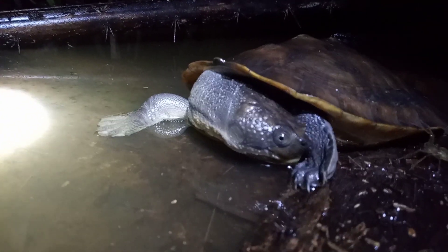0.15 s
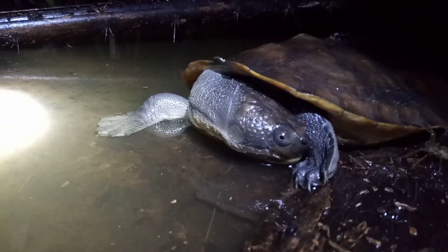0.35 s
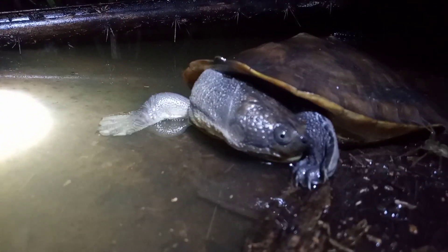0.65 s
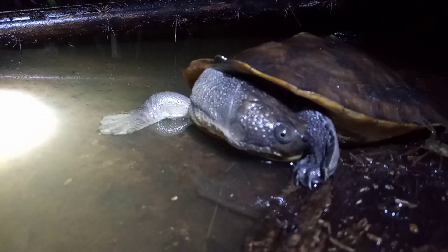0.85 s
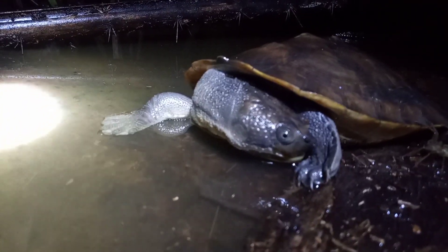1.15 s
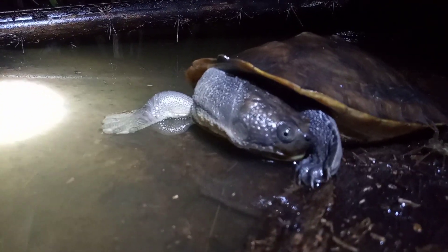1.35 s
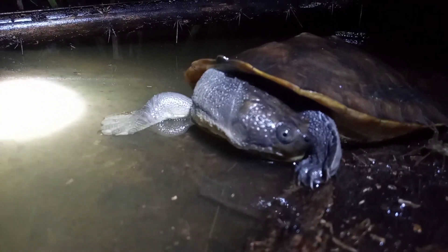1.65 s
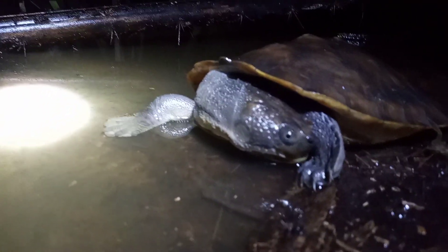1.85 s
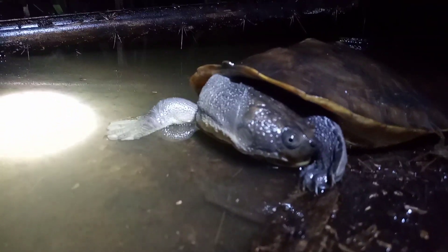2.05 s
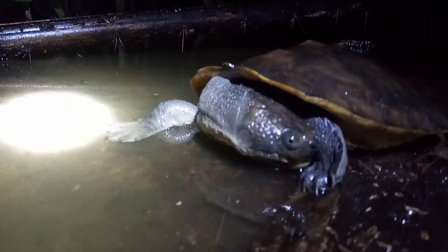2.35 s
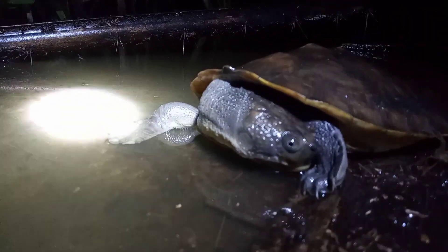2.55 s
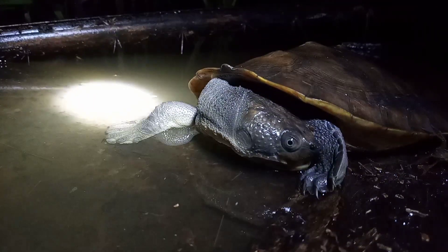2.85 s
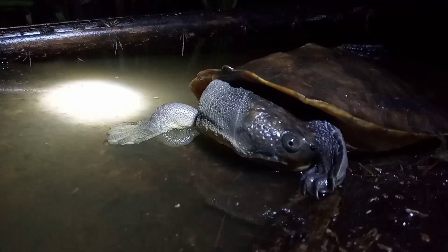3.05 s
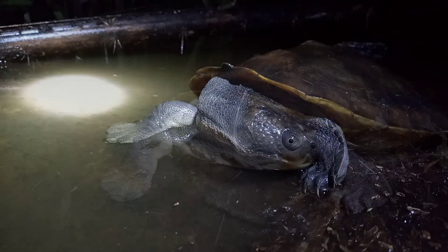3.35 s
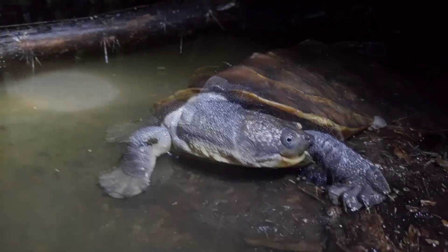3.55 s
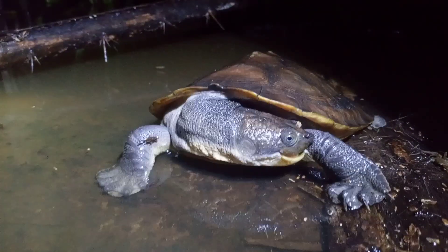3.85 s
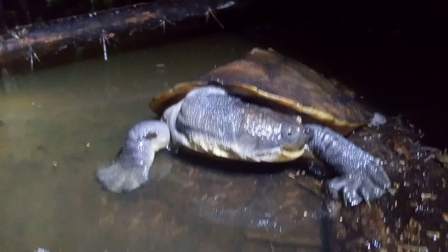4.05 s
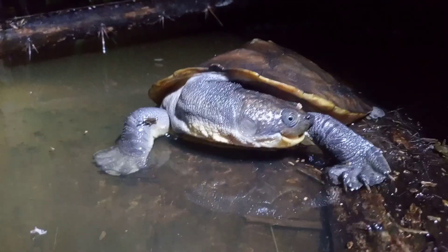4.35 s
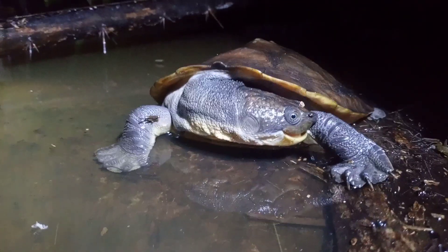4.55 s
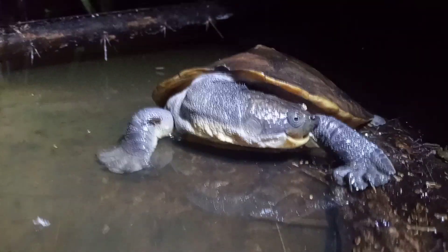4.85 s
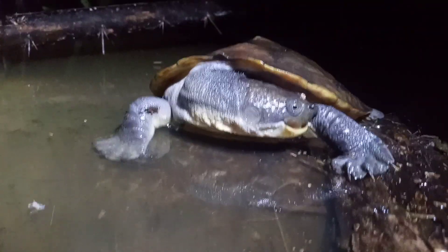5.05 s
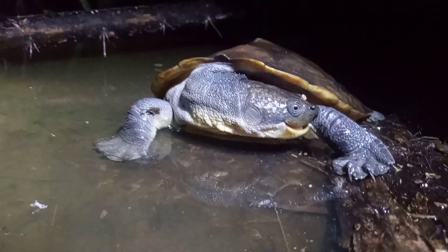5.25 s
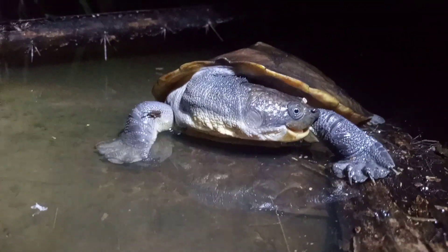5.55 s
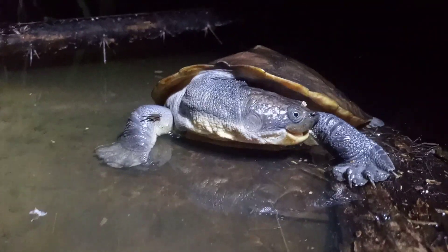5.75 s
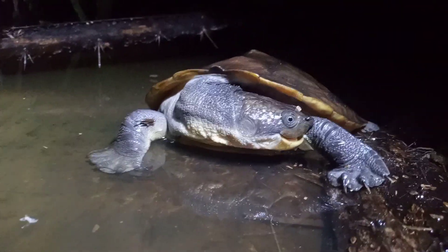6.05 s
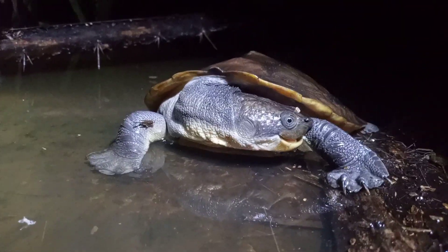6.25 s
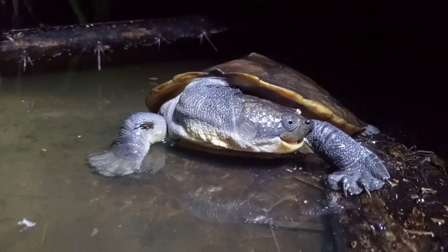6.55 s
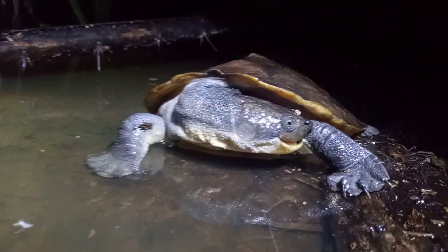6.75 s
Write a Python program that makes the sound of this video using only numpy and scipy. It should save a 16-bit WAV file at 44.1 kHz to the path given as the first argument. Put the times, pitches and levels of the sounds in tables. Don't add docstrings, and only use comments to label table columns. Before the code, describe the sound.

A swamp at night: high insect drone and pulsing katydid buzz, frogs whooping and quacking, water gurgling and dripping, then a sharp twig crack.

```python
import sys
import numpy as np
from scipy import signal
from scipy.fft import rfft, irfft, next_fast_len
from scipy.io import wavfile
from scipy.ndimage import uniform_filter1d, map_coordinates

SR = 44100
rng = np.random.default_rng(int(sys.argv[2]) if len(sys.argv) > 2 else 0)


def to_wav(sig):
    pcm = np.clip(np.atleast_2d(sig), -1, 1) * 32767
    pcm = np.round(pcm).astype(np.int16)
    wavfile.write(sys.argv[1], SR, pcm.T)


def linear_from_db(decibels):
    return 10 ** (np.asarray(decibels, float) / 20)


N = 304290
RIGHT_LEAD = 56

# (time [s], level [dB])
DRONE_LEVEL = [(0, -45), (2.88, -44), (3.55, -49.5), (4.28, -46), (5.5, -48), (5.9, -45.5), (6.9, -48)]
# (frequency [Hz], level [dB per Hz])
DRONE_COLOUR = [(3180, -63), (5400, -51), (5610, -53.5), (5990, -19), (6120, -64), (6210, -8), (6770, -2),
                (7100, 4.5), (7510, 4), (8000, 0), (8190, -4.5), (9510, -4.5), (9970, -15), (10300, -22.5),
                (11000, -87), (14300, -59), (22000, -120)]
# (wing strokes [per s], frequency [Hz], width [Hz], level [dB])
NEAR_SINGERS = [
    (177.7, 7250, 210, -57.5),
    (214.4, 7720, 84, -60.5),
    (223.5, 9250, 210, -71),
    (188.3, 6650, 150, -75),
]
# (time [s], level [dB])
LOW_BAND_LEVEL = [(0, -82), (3.3, -66), (3.7, -62.5), (6.9, -53.5)]
# (time [s], level [dB])
CRICKET_LEVEL = [(0, -88), (1.2, -67.5), (2.7, -57.5), (3.3, -59.5), (4.4, -54.5), (6.9, -55)]
# (start [s], end [s], first level [dB], last level [dB])
KATYDID_SPELLS = [
    (0, 0.122, -75, -72),
    (0.497, 0.746, -77, -56),
    (1.29, 1.405, -52, -60),
    (1.46, 1.67, -55, -49),
    (2.343, 2.698, -60, -48),
    (2.73, 3.437, -46.5, -52),
    (3.457, 3.89, -54, -68),
    (4.302, 5.67, -81, -68.5),
    (5.706, 6.224, -46.5, -45.5),
    (6.43, 6.9, -45, -45),
]
# (frequency [Hz], level [dB per Hz])
WING_COLOUR = [(7650, -74), (13000, -89), (13700, -11), (14100, 1), (14600, 14.5), (15000, 15),
               (15400, 17.5), (15800, 12.5), (16300, -27)]
# (time [s], level [dB])
CHORUS_LEVEL = [(0, -52.5), (.36, -52.5), (1.1, -50), (2.4, -57), (2.69, -54), (3.23, -55.5), (3.5, -97),
                (3.65, -50.5), (4.5, -55.5), (4.75, -51.5), (5.73, -60), (6.11, -52.5), (6.9, -61)]
# (time [s], level [dB])
GRIP_LEVEL = [(0, -70), (2.7, -71.5), (3.6, -80.5), (4.3, -74), (6.9, -76)]
# (frequency [Hz], level [dB per Hz])
RUMBLE_COLOUR = [(15, -37), (25, -47), (45, -15.5), (62, -6.5), (107, 0.5), (151, -3.5), (220, -12),
                 (300, -46), (390, -14), (660, -120)]
# (time [s], peak level [dB], camera shell level [dB])
BUMPS = [(0.581, -55, -37), (1.068, -54, -35), (1.128, -53, -27), (2.239, -58, -30), (4.157, -53, -5.5),
         (4.299, -57.5, 1), (4.748, -56.5, -11.5), (4.936, -43, -13), (5.095, -58, -6.5), (5.522, -50, -24),
         (5.928, -65, -5.5), (6.292, -58.5, -21)]
# (frequency [Hz], level [dB per Hz])
AIR_COLOUR = [(88, -54), (150, -30.5), (257, -15), (456, -19), (1240, -20.5), (1690, -21.5), (1940, -25.5),
              (2170, -2.5), (2270, -2), (2690, -4.5), (3000, -16.5), (4270, -19), (4760, -10), (5470, -25),
              (6000, -14), (7800, -66), (13200, -120)]
# (time the climb locks [s], tone level [dB], rasp level [dB], strongest partial [Hz], tone fade [dB/s])
WHOOPS = [(0.002, -51.5, -58, 2660, 166), (0.235, -45.5, -53.5, 2632, 80), (1.238, -49, -58, 2687, 102),
          (1.623, -49, -64, 2689, 117), (3.537, -43, -50, 2490, 230), (3.79, -44.5, -44.5, 2540, 269),
          (4.101, -37.5, -49.5, 2461, 313), (4.829, -47.5, -68, 2730, 133), (5.097, -44, -50.5, 2652, 93),
          (5.463, -43, -48.5, 2643, 75), (6.831, -50.5, -61, 2690, 137)]
# (lead [s], swell [dB], fade [dB/s], fade of the low note [dB/s])
RASPS = [(.066, 6, 900, 900), (0.084, 11, 302, 159), (0.076, 16, 270, 260), (0.058, 10, 278, 260),
         (0.069, 6.5, 498, 450), (0.072, 13, 600, 448), (0.064, -1, 900, 602), (0.072, 14, 338, 330),
         (0.075, 12.5, 352, 185), (0.076, 15.5, 350, 165), (0.05, 6.5, 370, 350)]
# (time [s], gain [dB], width [s])
THROBS = [(.06, 10.5, 0.0058), (.12, 6, 0.02), (0.278, 7, 0.011), (.34, 3, 0.014), (.42, 4, 0.038),
          (1.235, 2, .01), (1.29, 8.5, 0.029), (1.335, 12, .015), (1.62, 4.5, .02), (1.665, 11, 0.0056),
          (1.702, 14, 0.0079), (1.74, 7, 0.0084), (3.53, -5, 0.013), (3.55, 4.5, 0.013), (3.625, 13, .01),
          (3.812, 9, 0.012), (3.833, 18, 0.0034), (3.884, 22.5, 0.018), (4.108, -0.5, 0.014),
          (4.174, 16.5, 0.0082), (5.095, 6.5, 0.0081), (5.136, 8, 0.01), (5.225, 11.5, 0.015),
          (5.48, 9, 0.0093), (5.513, 12.5, 0.0066), (5.562, 6.5, 0.0039), (5.59, 7.5, 0.0058),
          (5.64, 9, 0.0099)]
# (multiple of the low note [count], level against the second partial [dB])
OVERTONES = [(3, -16), (4, -21), (5, -8)]
# (frequency [Hz], width [Hz], level [dB])
LIMP_SAC = [(1010, 110, -2.5), (1390, 270, -1), (2000, 170, 4.5)]
# (frequency [Hz], width [Hz], level [dB])
SLACK_SAC = [(1118, 78, 0), (1380, 160, -0.5), (2090, 57, -9)]
# (frequency [Hz], width [Hz], level [dB])
TAUT_SAC = [(1124, 81, -9.5), (1880, 750, -11.5), (2503, 200, 3), (3520, 81, -11), (4690, 72, -1.5)]
# (time [s], level [dB], fade [dB/s])
GURGLES = [
    (0.002, -61, 243),
    (1.171, -59, 175),
    (2.51, -49, 112),
    (2.646, -59.5, 273),
    (2.99, -63.5, 86),
    (6.516, -71, 51),
    (6.686, -69, 403),
    (6.834, -65, 172),
]
# (time [s], peak level [dB], body level [dB], left over right [dB], ring [Hz])
TICKS = [(0.135, -52.5, -39.5, 11, 14700), (0.5574, -75, -65, 12, 14600), (0.612, -37, -48, 9, 14600),
         (1.0416, -49, -52, 15, 10200), (1.176, -30, -67, 25, 14900), (1.6591, -72, -76, 10, 14700),
         (2.436, -56, -41.5, 0, 14900), (2.621, -29.5, -41, 7, 14600), (2.644, -45, -28, 15, 14910),
         (2.68, -53, -30.5, 12, 15000), (2.885, -56, -70, 8, 11500), (2.912, -50, -69, 16, 11800),
         (2.99, -90, -52, 22, 14730), (3.072, -49, -64, 3, 10000), (3.603, -51, -47, 16, 14720),
         (4.19, -39, -72, 12, 9950), (5.1898, -61.5, -85, -29, 10980), (6.768, -42.5, -57.5, -28, 14700),
         (6.795, -50, -50, -20, 15100), (6.846, -62, -75, -37, 14900)]
# (time [s], level [dB], fade [dB/s])
FAR_CALLS = [(.19, -61, 47), (.45, -69, 200), (.56, -62.5, 13.5), (1.29, -51.5, 108), (1.618, -63, 33),
             (1.83, -65, 75), (2.1, -71, 22), (2.512, -52.5, 87), (2.68, -66, 63), (2.705, -52, 96),
             (3.031, -73, 33), (5.859, -71, 50), (6.1, -77.5, 33), (6.54, -63, 57)]
# (time [s], level [dB], frequency [Hz], time to fall 60 dB [s])
DRIPS = [(.241, -47, 3400, .015), (.557, -47, 1600, .012), (.558, -41, 3000, .015), (.559, -49, 3800, .012),
         (.981, -41, 3900, .018), (1.665, -44, 5680, .014), (2.438, -42, 7000, .012),
         (2.645, -43, 4300, .015), (2.646, -46, 2400, .012), (2.678, -41, 3700, .012),
         (2.912, -50, 2500, .01), (2.99, -48, 3300, .012), (4.285, -50, 5800, .01)]
# (time [s], level [dB], frequency [Hz], time to fall 60 dB [s])
HOOTS = [(.325, -49.5, 417, 0.14), (.472, -64, 620, 0.047), (.64, -63.5, 483, 0.18), (.7, -60, 529, 0.17),
         (1.157, -36, 464, 0.019), (1.158, -44.5, 680, 0.024), (1.881, -66, 516, 0.4),
         (4.539, -60, 319, 0.15), (5.49, -61, 600, 0.25), (5.75, -64.5, 635, 0.13),
         (6.68, -55.5, 810, 0.039), (6.52, -65.5, 659, 0.27), (2.502, -43, 620, 0.036),
         (2.504, -40, 744, 0.028), (2.518, -34, 710, 0.025), (2.529, -45, 825, .03),
         (2.541, -52, 800, .025), (2.555, -45, 600, .035), (2.645, -42, 793, 0.032)]
# (time [s], body level [dB], hiss level [dB], fade [dB/s], voice over body [dB])
QUACKS = [(.56, -60, -74, 88.5, -17), (.68, -66, -97, 118, 1), (0.879, -58.5, -77, 146, -5),
          (1.273, -49, -53.5, 120, -3), (1.791, -72.5, -80, 37, 9.5), (2.68, -52.5, -53, 115, 5),
          (2.993, -58.5, -96, 208, -27), (4.798, -64, -99, 123, -14.5), (5.677, -40, -45, 139, -20),
          (5.834, -43.5, -52, 112, -5), (6.071, -63, -74, 33, -1), (6.522, -52.5, -54, 129, 4.5)]
QUACK_RISES = [1200, 1200, 1200, 1200, 1200, 1500, 1200, 1200, 920, 500, 1200, 1200]
MOUTH_OPENING = [0.093, 0.088, .1, 0.43, .1, 0.34, .1, .1, 0.68, .9, 0.12, 0.27]
# (frequency [Hz], width [Hz], level [dB])
QUACK_THROAT = [(1564, 187, 5.5), (2190, 360, 1.5), (2550, 470, 5), (3450, 870, -0.5), (5300, 1060, -2.5)]
# (frequency [Hz], width [Hz], level [dB])
WIDE_THROAT = [(1730, 250, -1.5), (2168, 280, -4.5), (2790, 280, 2.5), (3430, 300, -0.5),
               (4420, 1100, -10.5)]
# (frequency [Hz], level [dB per Hz])
HISS_COLOUR = [(4500, -22), (8500, 0.5), (10000, 5.5), (12500, 2), (14500, -13), (16000, -1.5)]
# (time [s], level [dB], frequency [Hz], time to fall 60 dB [s])
GULPS = [
    (5.665, -37, 1434, 0.044),
    (5.685, -36, 1800, .04),
    (5.808, -44, 1414, .04),
]
# (time [s], level [dB], extra bass [dB])
CRACKS = [
    (5.3057, -24, 0),
    (5.30615, -18.3, -3),
    (5.3077, -29, 0),
    (5.311, -36, 0),
    (5.3368, -35, -20),
]
# (frequency [Hz], level [dB], time to fall 60 dB [s])
TWIG_RINGS = [(620, -18.5, 0.024), (1120, -3.5, 0.034), (2470, -10.5, 0.017), (2970, 14.5, 0.0037),
              (6550, 20, 0.0027), (7100, -15, 0.0035), (8700, 0, 0.0048), (10200, 4.5, 0.0017),
              (15200, -6, 0.0041)]
# (frequency [Hz], time to fall 60 dB [s])
TREES = [(500, 0.07), (2500, 0.31), (10000, 0.066)]
# (frequency [Hz], loss [dB])
SHADOW = [(60, 7.5), (92, 12.5), (140, 4), (210, 7), (330, 5.5), (500, 5.5), (770, 8), (1170, 5.5),
          (1790, 13.5), (2740, 24.5), (4190, 82), (6410, 35.5), (9810, 4), (15000, 11.5)]


def unit(x):
    return x / np.sqrt(np.mean(x ** 2) + 1e-20)


def along(points, hz):
    f, v = np.transpose(points)
    return np.interp(np.log(hz + 1), np.log(f + 1), v)


def level_curve(rows):
    s, db = np.transpose(rows)
    return np.interp(np.arange(N) / SR, s, db, left=-120, right=-120)


def swells(s, db, rise, fade, hold_s=0., end_db=None):
    t = np.arange(0, N + 32, 32)[:, None] / SR
    drift = 0 if end_db is None else (end_db - db) * np.clip((t - s) / hold_s, 0, 1)
    level = db + drift - rise * np.maximum(s - t, 0) - fade * np.maximum(t - s - hold_s, 0)
    return np.interp(np.arange(N) / SR, t[:, 0], linear_from_db(level).sum(1))


def wobble(rate):
    return map_coordinates(rng.standard_normal(int(N * rate / SR) + 4), [np.arange(N) * rate / SR])


def filtered(x, response):
    m = next_fast_len(N + 8192)
    return irfft(rfft(x, m) * response(np.fft.rfftfreq(m, 1 / SR)), m)[..., :N]


def resonances(modes):
    def response(f):
        total = 0
        for k, (centre, width, db) in enumerate(modes):
            peak = 1j * f * width / (centre * centre - f * f + 1j * f * width)
            total = total + (-1) ** k * linear_from_db(db) * peak
        return total
    return response


def colour(spectrum):
    return lambda hz: linear_from_db(along(spectrum, hz))


def rush(response, patchy_db, grain_db=0., grain_rate=200., alike=0.):
    z = signal.stft(rng.standard_normal((2, N + 512)), nperseg=512)[2]
    field = uniform_filter1d(rng.standard_normal(z.shape[1:]), size=4, axis=0)
    field = uniform_filter1d(field, size=8, axis=1)
    left, other = signal.istft(z * linear_from_db(patchy_db * unit(field)), nperseg=512)[1][:, :N]
    right = alike * np.roll(left, -RIGHT_LEAD) + np.sqrt(1 - alike ** 2) * other
    return unit(filtered(np.array([left, right]) * linear_from_db(grain_db * wobble(grain_rate)), response))


def pulses(rate, jitter, scatter_db, speed=1.):
    turns = np.cumsum(rate * speed * (1 + jitter * wobble(rate / 2))) / SR
    return (np.diff(np.floor(turns), prepend=0) > 0) * linear_from_db(scatter_db * rng.standard_normal(N))


def ring(hz, db, t60, attack):
    t = np.arange(max(round(t60 * SR), 1024)) / SR
    return linear_from_db(db - 60 * t / t60) * np.sin(2 * np.pi * hz * t) * (1 - np.exp(-t / attack))


def add(track, s, sound):
    part = track[..., round(s * SR):][..., :sound.shape[-1]]
    part += sound[..., :part.shape[-1]]


def rings(events, attack):
    track = np.zeros(N)
    for s, db, hz, t60 in events:
        add(track, s, ring(hz, db, t60, attack))
    return track


def among_trees(x, wet_db):
    hz, t, z = signal.stft(rng.standard_normal((2, SR // 2)), SR, nperseg=256)
    tail = signal.istft(z * linear_from_db(-60 * t / along(TREES, hz)[:, None]), SR, nperseg=256)[1]
    wet = signal.fftconvolve(x[None], tail / np.linalg.norm(tail[0]), axes=1)[:, :N]
    return np.array([x, np.roll(x, -RIGHT_LEAD)]) + linear_from_db(wet_db) * wet


def insect_drone():
    crowd = rush(colour(DRONE_COLOUR), patchy_db=2.0, grain_db=0.5, grain_rate=170)
    drone = linear_from_db(level_curve(DRONE_LEVEL) - 2.2) * crowd
    for rate, hz, width, db in NEAR_SINGERS:
        wing = resonances([(hz, width, 0)])
        song = unit(filtered(pulses(rate, jitter=.06, scatter_db=3), lambda f: wing(f) ** 2))
        drone += among_trees(song * linear_from_db(db + 2.8 * wobble(6.6)), wet_db=1.0)
    low = resonances([(6385, 680, 0)])
    return drone + linear_from_db(level_curve(LOW_BAND_LEVEL)) * rush(lambda f: low(f) ** 2, patchy_db=1.0)


def crickets():
    band = resonances([(4797, 480, 0)])
    return linear_from_db(level_curve(CRICKET_LEVEL) - 12) * rush(lambda f: band(f) ** 2, patchy_db=1.5)


def katydid():
    stroke_hz, turn_hz, lag = 31, 14900, 1.5
    stroke = 2 * np.pi * np.cumsum(stroke_hz * (1 + .03 * wobble(1.7))) / SR

    def throb(turn):
        return linear_from_db(3.1 * np.sin(turn) + 1.4 * np.sin(3 * turn))

    wing = rush(colour(WING_COLOUR), patchy_db=1.2, grain_db=2, grain_rate=700, alike=.55)
    high = filtered(wing, lambda f: np.clip((f - turn_hz) / 500 + .5, 0, 1))
    buzz = unit(throb(stroke) * high + throb(stroke - lag) * (wing - high))
    start, end, first_db, last_db = np.transpose(KATYDID_SPELLS)
    spells = swells(start, first_db, rise=360, fade=250, hold_s=end - start, end_db=last_db)
    far_katydids = linear_from_db(-78)
    return (spells + far_katydids) * linear_from_db(-1.0) * buzz


def far_chorus():
    band = resonances([(2267, 214, 0)])
    blur = rush(lambda f: band(f) ** 2, patchy_db=4.0, grain_db=2.0, grain_rate=25)
    return linear_from_db(level_curve(CHORUS_LEVEL) - 5.0) * blur


def handling():
    rumble = rush(colour(RUMBLE_COLOUR), patchy_db=1, grain_db=4.0, grain_rate=18, alike=0.59)
    out = linear_from_db(level_curve(GRIP_LEVEL) + 1.0) * rumble
    for s, db, shell_db in BUMPS:
        bump = ring(98.3, db + 9.5, 0.092, attack=0.012)
        add(bump, 0, ring(149, db + 3.5, 0.061, attack=0.0075))
        add(bump, 0, ring(341, db + shell_db + 9.5, 0.047, attack=0.0038))
        add(out, s, bump * linear_from_db([[0], [-8]]))
    return out


def night_air():
    return linear_from_db(-61.0) * rush(colour(AIR_COLOUR), patchy_db=5.5)


def whoop_climb():
    climb_s, ends_before_lock_s = .035, .028
    s, t = np.transpose(WHOOPS)[0], np.arange(N) / SR
    call = np.searchsorted(s[1:] - .11, t)
    to_lock = s[call] - t
    return call, to_lock, np.clip((to_lock - ends_before_lock_s) / climb_s, 0, 1)


def whoop_rasps():
    s, _, rasp_db, _, _ = np.transpose(WHOOPS)
    lead, swell_db, fade, _ = np.transpose(RASPS)
    call, to_lock, slack = whoop_climb()
    gain = swells(s - lead, rasp_db - swell_db, 1570, fade, lead - 0.0082, rasp_db)
    slow = np.clip(to_lock / .08, 0, 1)
    train = pulses(205, jitter=.06, scatter_db=2.5, speed=1 - .18 * slow)
    mouth = resonances([(1800, 2600, 0)])

    def through(sac):
        return unit(filtered(train, lambda f: resonances(sac)(f) * mouth(f) ** 2))

    fill_s = .025
    empty = np.clip((to_lock - lead[call] + fill_s) / fill_s, 0, 1)
    low = linear_from_db(1.5) * empty * through(LIMP_SAC) + (1 - empty) * through(SLACK_SAC)
    rasp = slack * low + linear_from_db(-1.5) * (1 - slack) * through(TAUT_SAC)
    return among_trees(linear_from_db(6.5) * gain * rasp, wet_db=-3)


def whoop_tones():
    s, tone_db, rasp_db, hz, fade = np.transpose(WHOOPS)
    call, _, slack = whoop_climb()
    tone_rise, hold_db = 400, 6.5
    gain = swells(s - 0.45 * hold_db / fade, tone_db, tone_rise, fade, hold_db / fade)
    t = np.arange(N) / SR
    gain = gain * linear_from_db(sum(db * np.exp(-((t - at) / width) ** 2) for at, db, width in THROBS))
    top_hz = hz[call]
    rough = np.where(top_hz < 2600, 1, .7)
    climb_share = .13
    turn = np.pi * np.cumsum(top_hz * (1 - climb_share * slack + .005 * rough * wobble(160))) / SR
    effort = gain / linear_from_db(-36)
    partials = sum(linear_from_db(db) * np.sin(k * turn) for k, db in OVERTONES)
    overtones = rough ** 2 * effort ** .8 * (.8 + .7 * wobble(350)) * partials
    flutter = np.sin(2 * np.pi * np.cumsum(105 * (1 + .3 * wobble(30))) / SR)
    clear = np.abs(1 + rough * (.35 * wobble(170) + 0.55 * flutter)) * np.sin(2 * turn)
    hoarse = .3 * rough * effort ** .4 * wobble(600) * np.sin(1.93 * turn)
    low_gain = swells(s, rasp_db - 1, tone_rise, np.transpose(RASPS)[3])
    low_note = (1 - slack) * low_gain * (.6 + wobble(260)) * np.sin(turn)
    tone = among_trees(linear_from_db(1.5) * gain * (clear + hoarse + overtones), wet_db=-9)
    return tone + among_trees(low_note, wet_db=-5.5)


def gurgles():
    lumps = linear_from_db(1.5 * wobble(60) + 3.5 * wobble(500)) * rng.standard_normal(N)
    wash = resonances([(600, 410, -6.0), (1570, 240, -1.5), (2470, 4100, -6.5)])
    water = unit(filtered(lumps, lambda f: wash(f) * f / (f + 300) / (1 + (f / 3000) ** 2)))
    s, db, fade = np.transpose(GURGLES)
    return among_trees(swells(s, db, 2500, fade) * linear_from_db(-1.0) * water, wet_db=0.5)


def ticks():
    out, t = np.zeros((2, N)), np.arange(600) / SR
    for s, db, body_db, pan_db, hz in TICKS:
        grit = np.diff(rng.standard_normal((2, len(t) + 1)))
        sharp = ring(hz, db + 7.5, 0.003, attack=0.0002)[:len(t)]
        sharp = sharp + linear_from_db(db - 23 - 60 * t / 0.013) * grit[0]
        dull = np.diff(uniform_filter1d(grit[1], size=6), prepend=0)
        body = linear_from_db(body_db + 3.5) * dull * linear_from_db(1 - 60 * t / 0.011)
        add(out, s, (sharp + body) * linear_from_db([[0], [0.5 - pan_db]]))
    return out


def far_caller():
    throat = resonances([(1664, 132, 0)])
    s, db, fade = np.transpose(FAR_CALLS)
    voice = rush(lambda f: throat(f) ** 2, patchy_db=2.5, grain_db=3, grain_rate=45)
    return swells(s, db, 340, fade) * linear_from_db(-1.5) * voice


def drips():
    return among_trees(rings(DRIPS, attack=0.000067), wet_db=-61.0)


def hoots():
    return among_trees(rings(HOOTS, attack=0.003) * linear_from_db(4.5 * wobble(80)), wet_db=-2)


def quacks():
    s, body_db, hiss_db, fade, voice_db = np.transpose(QUACKS)
    hold_s = 0.0068
    body_gain = swells(s, body_db, QUACK_RISES, fade, hold_s)
    hiss_gain = swells(s, hiss_db, QUACK_RISES, 1.15 * fade, hold_s=0.056)
    voice_gain = swells(s, body_db + voice_db, QUACK_RISES, 0.8 * fade, hold_s)
    train = pulses(190, jitter=.2, scatter_db=2.5)
    breath = np.sqrt(np.abs(uniform_filter1d(train, size=90))) * rng.standard_normal(N)
    mouth = resonances([(2954, 3060, 0)])

    def through(throat, source):
        return unit(filtered(source, lambda f: resonances(throat)(f) * mouth(f) ** 3))

    source = unit(train) + 0.85 * unit(breath)
    wide = np.array(MOUTH_OPENING)[np.searchsorted(s[1:] - .03, np.arange(N) / SR)]
    body = np.sqrt(1 - wide) * through(QUACK_THROAT, source) + np.sqrt(wide) * through(WIDE_THROAT, source)
    hiss = unit(filtered(unit(breath) + 3.6 * rng.standard_normal(N), colour(HISS_COLOUR)))
    voice = through(QUACK_THROAT, pulses(538.5, jitter=.035, scatter_db=-3.0))
    return among_trees(voice_gain * voice + body_gain * body + linear_from_db(1.0) * hiss_gain * hiss, wet_db=-2.0)


def gulps():
    return among_trees(rings(GULPS, attack=.006), wet_db=-61.0)


def twig_snap():
    twig = np.zeros(N)
    for s, db, bass_db in CRACKS:
        for hz, level, t60 in TWIG_RINGS:
            add(twig, s, ring(hz, db + level + bass_db * (hz < 1500), t60, attack=.0006)[:1024])
    return among_trees(twig, wet_db=-61.0)


def scene():
    background = insect_drone() + crickets() + katydid() + far_chorus() + handling() + night_air()
    frogs = whoop_rasps() + whoop_tones() + far_caller() + quacks() + gulps()
    pond = gurgles() + drips() + hoots()
    left, right = linear_from_db(6.0) * (background + frogs + pond + ticks() + twig_snap())
    return np.array([left, filtered(right, lambda hz: linear_from_db(-along(SHADOW, hz)))])


def band_limit(x):
    return signal.sosfilt(signal.butter(12, 16990, fs=SR, output="sos"), x)


def record(dry):
    after = np.arange(N) / SR - CRACKS[0][0] - .004
    duck_db = -9 * np.exp(-np.abs(after) / 0.041) * (after > 0)
    mix = filtered(dry * linear_from_db(duck_db), lambda hz: hz < 15770)
    return band_limit(mix)


dry = scene()
out = record(dry)
to_wav(out)
```